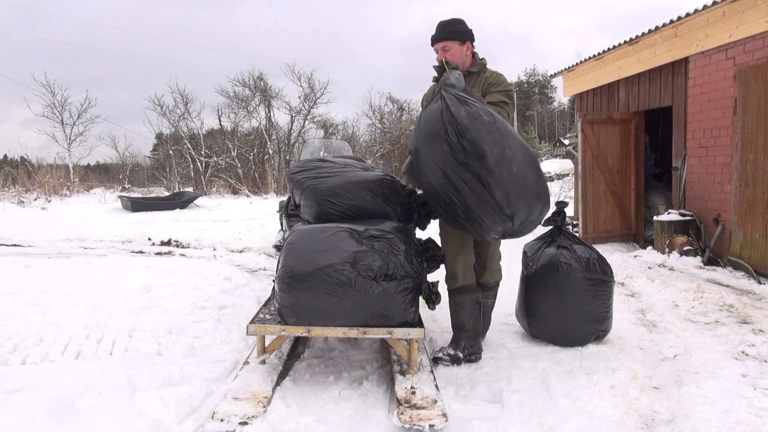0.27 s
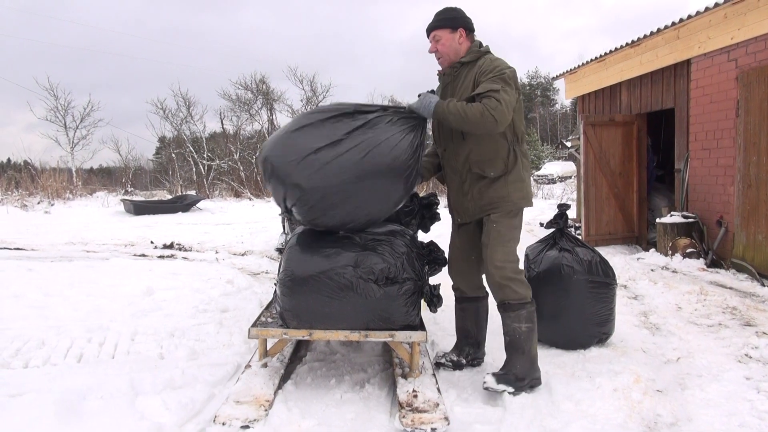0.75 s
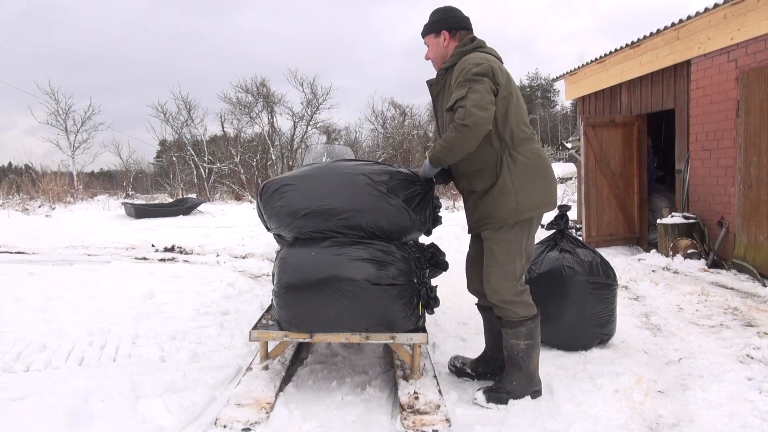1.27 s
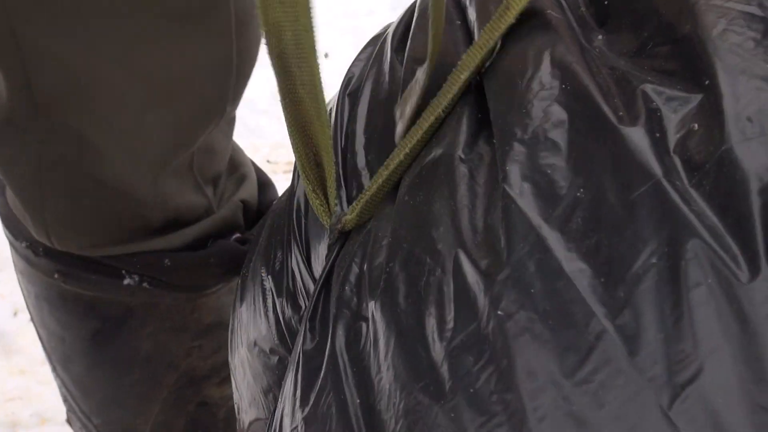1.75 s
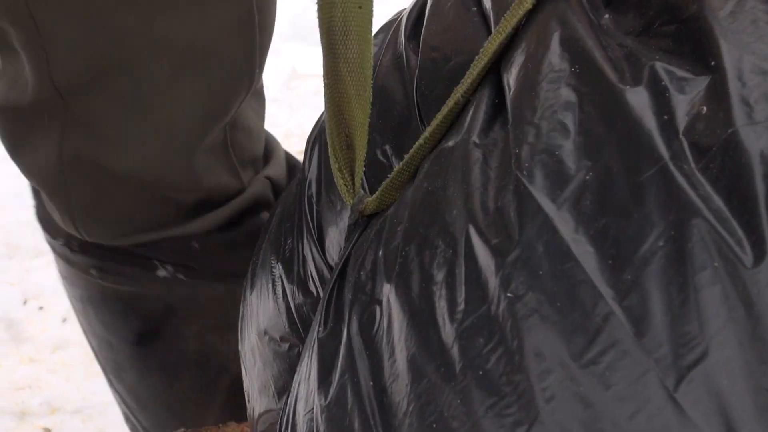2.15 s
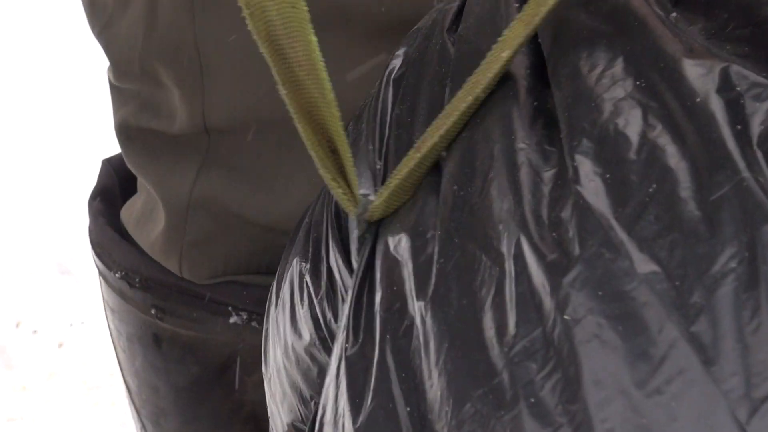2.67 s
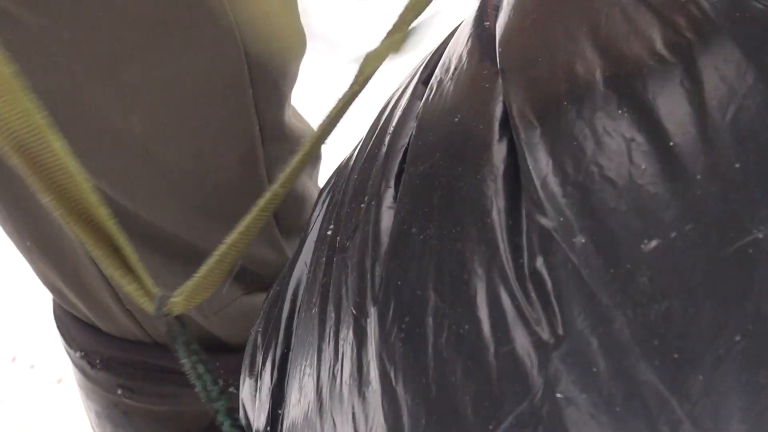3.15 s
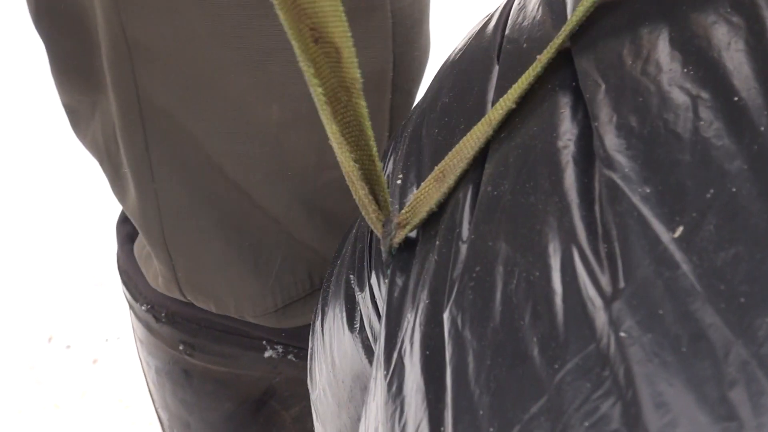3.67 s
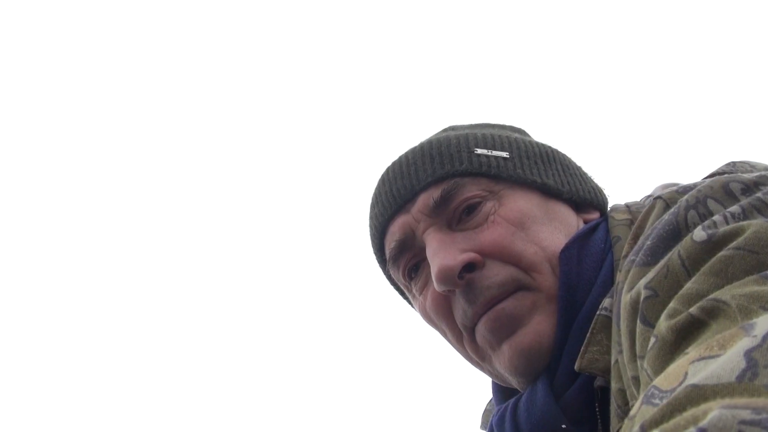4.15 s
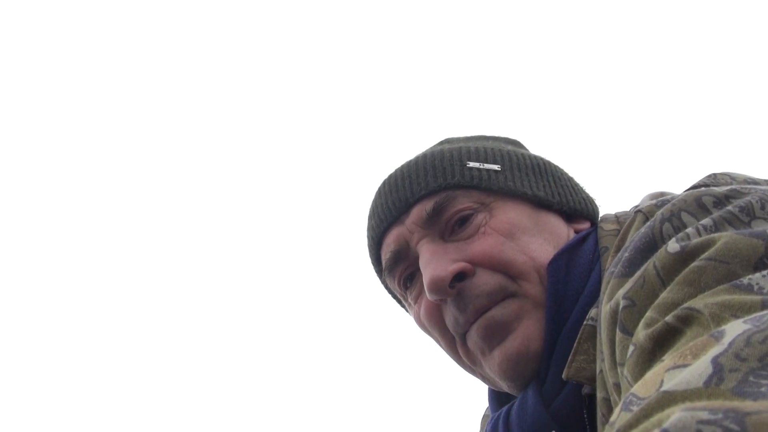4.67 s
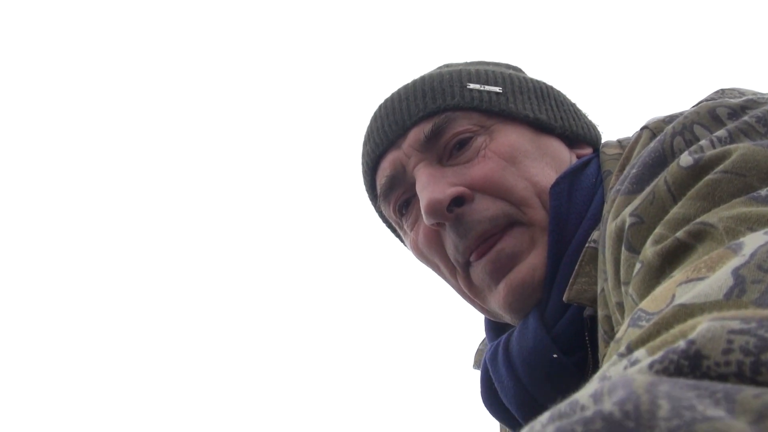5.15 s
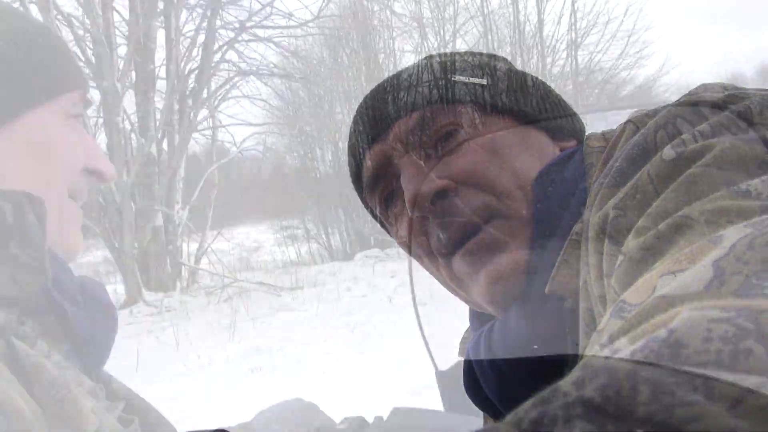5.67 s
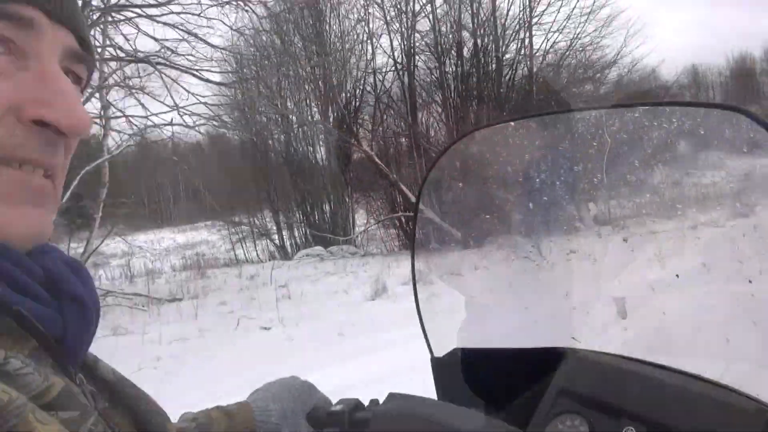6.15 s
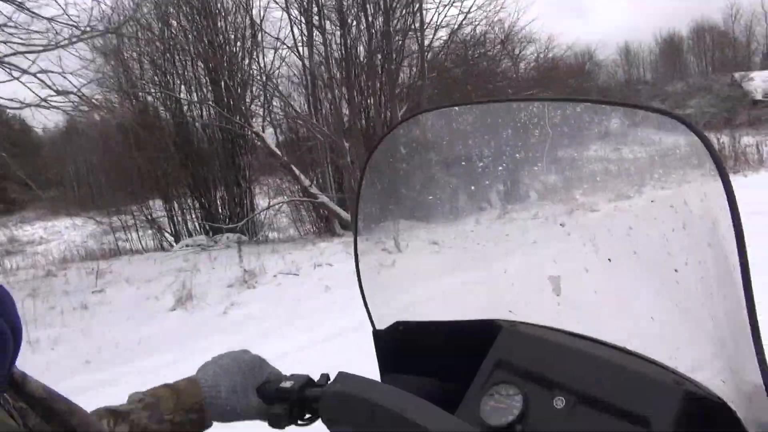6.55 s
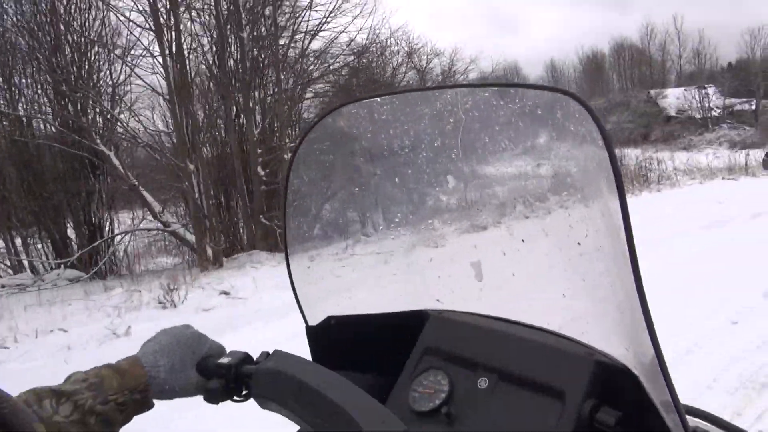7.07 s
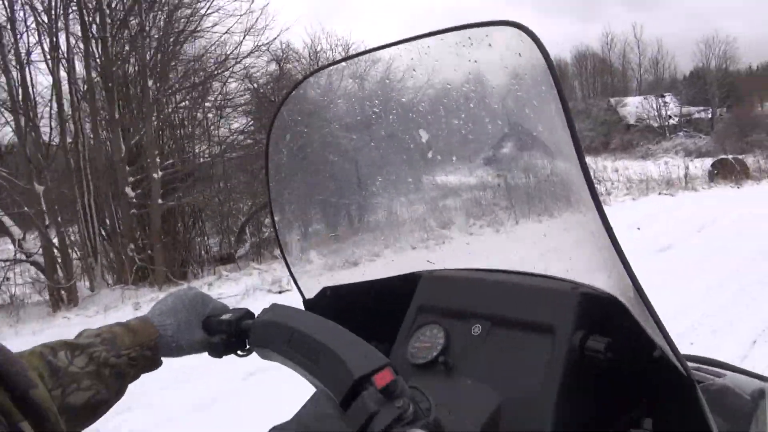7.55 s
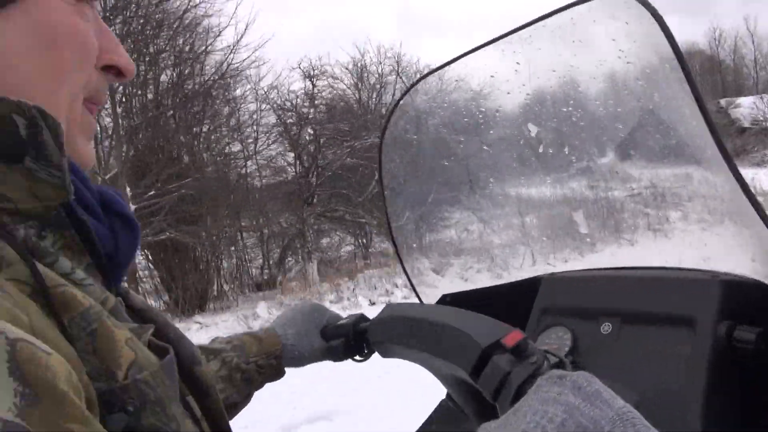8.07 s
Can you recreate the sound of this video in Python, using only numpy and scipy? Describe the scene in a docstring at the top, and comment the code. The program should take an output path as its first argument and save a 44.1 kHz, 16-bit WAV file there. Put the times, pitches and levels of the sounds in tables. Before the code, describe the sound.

In open snow with no echo, plastic slides over plastic, rustling and snapping among the dull knocks of heavy bags and boots. Close cloth rubbing follows, slightly left, and a strap squeaks faintly as it tightens. The handling then dissolves into a snowmobile ride heard from the driver's seat, the engine holding a nearly even pitch while its casing rattles, a gear whines and the rubber track churns along.

```python
"""Loading a sledge and riding off

Stuffed plastic sacks are swung onto a sledge in the snow and strapped down: the film swishes,
crinkles and thuds. A sleeve rubs over the load close by, a little to the left. Then a two-stroke
snowmobile fades in, heard from the seat at a steady speed: the exhaust drones, the engine
rattles, a gear whines and the rubber track churns the snow."""
import sys
import numpy as np
from scipy import signal
from scipy.fft import rfft, irfft
from scipy.io import wavfile

SR = 44100
rng = np.random.default_rng(int(sys.argv[2]) if len(sys.argv) > 2 else 0)


def generate_wav(sig):
    """Save sig (samples, or channels by samples) to the path in sys.argv[1] as 16-bit PCM at SR."""
    pcm = np.round(np.clip(np.atleast_2d(sig).T, -1, 1) * 32767).astype(np.int16)
    wavfile.write(sys.argv[1], SR, pcm)


N = 366912
TIME = np.arange(N) / SR

# The tone of sliding film and of flapping folds. Each row: frequency in Hz, relative level in dB.
FILM_TONE = [(290, -5.5), (480, -0.5), (707, -1.5), (878, -3.5), (1050, -0.5), (1480, 1), (1850, 0.5),
             (2150, -8), (2550, 0.5), (3000, -1.5), (5190, -5), (8200, -6.5), (9100, -6), (9750, -12.5),
             (10700, -12), (12000, -12.5), (13300, -23), (14400, -22), (15800, -28)]
FLAP_TONE = [(29, -51), (50, -29), (107, 2), (135, 4), (235, 1), (310, -8.5), (460, -5.5), (611, -5.5),
             (900, -17), (1170, -19), (1980, -120)]
# A sack slides. Each row: start, rise, hold and fade in seconds, then swish level, extra treble
# and flap level in dB.
SACK_SLIDES = [(0.0, 0.00096, 0.35, 0.37, -55, 3, -60), (0.176, 0.0046, 0.0066, 0.021, -68, 12, -63),
               (0.427, 0.009, 0.14, 0.15, -56, -3, -59), (0.662, 0.023, .004, 0.043, -63.5, 20, -89),
               (0.693, 0.05, 0.04, 0.12, -55, 10.5, -80), (0.747, 0.092, 0.28, 0.1, -47, 6, -75),
               (0.869, 0.084, 0.027, 0.079, -42.5, -29, -37.5),
               (0.983, 0.025, 0.072, 0.092, -48.5, -13, -41),
               (1.165, 0.039, 0.064, 0.24, -47.5, 1.5, -55.5), (1.406, 0.049, 0.1, 0.16, -54, 0.5, -57.5),
               (1.627, 0.044, 0.045, 0.071, -57.5, 0, -49.5), (1.69, 0.056, 0.13, 0.078, -43.5, -0.5, -42),
               (1.893, 0.12, 0.045, 0.21, -51.5, 0, -54.5), (2.143, 0.1, 0.038, 0.44, -56, -1, -55),
               (2.728, 0.03, 0.019, 0.12, -53, 6.5, -63.5), (2.782, 0.094, 0.024, 0.61, -51, 3.5, -58),
               (2.908, 0.016, 0.01, 0.04, -54.5, 11, -65), (2.994, 0.063, 0.016, 0.094, -46, 7, -46.5),
               (3.106, 0.051, 0.066, 0.077, -51, 4, -64), (3.4, 0.019, 0.025, 0.46, -64.5, 3, -59),
               (3.546, 0.11, 0.0098, 0.14, -63, 0, -51.5)]
# Where the sacks slide. Each row: time in seconds, dB louder on the left.
SACK_PAN = [(0, -0.1), (2.6, -1.5), (2.9, -3.5), (3.6, -3)]

def sliding_sacks():
    """Film slides over film: tiny creases give way, more of them the faster it moves; slack folds flap."""
    strokes = np.array([stroke(*row[:4]) for row in SACK_SLIDES])
    swish_db, treble_db, flap_db = np.transpose(SACK_SLIDES)[4:]
    slide_gain = joint_gain(strokes, swish_db)
    treble_gain = joint_gain(strokes, swish_db + treble_db)
    creases = clicks(4000 * np.sqrt(slide_gain / slide_gain.max()), spread_db=3.5)
    swish = shape_noise(hiss() + 0.62 * creases, FILM_TONE, CENTRE, side_db=-24)
    treble = signal.sosfiltfilt(signal.butter(1, 6000, "high", fs=SR, output="sos"), swish)
    flap = shape_noise(clicks(500, spread_db=2.5), FLAP_TONE, CENTRE, side_db=-20.5)
    sliding = ((swish - treble) * slide_gain + treble * treble_gain) * from_db(0.73 * drift(78))
    crinkle = from_db(-15) * crackles(500, low_hz=5000, high_hz=11000) * treble_gain
    folds = from_db(-13) * crackles(160, low_hz=2400, high_hz=4580, width_share=0.062, count=4)
    flapping = flap * joint_gain(strokes, flap_db) * from_db(-1.5 * drift(23))
    place_db, = follow(SACK_PAN)
    return (sliding + crinkle + folds * slide_gain + flapping) * pan(place_db)


# Knocks of the load and boots. Each row: start in seconds, body level in dB, base pitch in Hz,
# ring time in seconds, slap level in dB, top of the slap in Hz, pitch of the sack's skin in Hz.
KNOCKS = [(0.035, -33.5, 170, 0.042, -65, 700, 400), (0.049, -33, 200, 0.032, -33.5, 900, 520),
          (0.182, -39, 225, 0.057, -53.5, 700, 400), (0.28, -36.5, 201, .045, -46, 900, 500),
          (0.29, -40, 252, 0.022, -34.5, 1580, 477), (0.325, -30.5, 262, .035, -39, 700, 450),
          (0.341, -35, 218, 0.066, -35, 990, 480), (0.429, -30, 229, .026, -37, 900, 450),
          (0.444, -16, 155, .044, -25.5, 910, 534), (0.449, -43, 201, .03, -29.5, 1500, 376),
          (0.943, -16.5, 238, 0.035, -22.5, 1100, 560), (0.985, -22.5, 260, .048, -40, 1000, 446),
          (1.3, -11, 129, 0.022, -26.5, 960, 444), (1.347, -27.5, 131, 0.057, -42, 700, 380),
          (1.386, -31, 152, 0.058, -31, 784, 424), (1.463, -34, 161, .034, -35.5, 1400, 583),
          (1.747, -21, 138, .04, -40, 1800, 500), (1.758, -23.5, 148, .041, -22.5, 1330, 456),
          (1.834, -18, 144, 0.061, -25, 1100, 400), (1.9075, -15, 172, 0.049, -15.5, 980, 526),
          (1.922, -16, 171, 0.034, -23, 990, 566), (1.948, -21.5, 186, .022, -36, 900, 400),
          (2.032, -30.5, 131, 0.1, -49, 700, 380), (2.2323, -17.5, 144, 0.032, -35, 1500, 395),
          (2.454, -28.5, 205, 0.11, -32, 620, 450), (2.474, -26, 208, 0.018, -30, 930, 446),
          (2.521, -17.5, 147, 0.036, -30, 1700, 413), (2.569, -24.5, 150, .04, -37, 1600, 403),
          (2.591, -21, 137, 0.049, -37, 1700, 410), (3.064, -32, 231, 0.11, -39, 900, 480),
          (3.342, -33, 146, 0.04, -63, 597, 386), (3.419, -34.5, 214, .03, -49, 760, 560),
          (3.447, -38, 189, .034, -60, 600, 400), (3.4645, -21, 204, 0.045, -33, 1000, 335),
          (3.473, -22, 179, 0.019, -35, 1400, 364), (3.578, -48, 190, 0.03, -44, 1400, 350),
          (3.606, -25, 157, 0.045, -37, 1520, 403), (3.633, -29, 194, 0.06, -40, 900, 370),
          (3.818, -26, 200, .03, -35, 1250, 332), (3.823, -17.5, 143, 0.049, -25, 1270, 332),
          (4.012, -28, 187, 0.11, -31, 900, 620), (4.187, -17, 118, 0.046, -52, 800, 400),
          (4.273, -22, 121, .062, -29, 900, 600), (4.298, -16, 167, 0.055, -24, 794, 613),
          (4.571, -13, 143, 0.045, -38, 1300, 400), (4.586, -14, 136, 0.028, -33, 1300, 380),
          (4.683, -16.5, 127, 0.031, -30, 706, 428), (4.707, -19.5, 150, 0.048, -52, 600, 400),
          (4.736, -15, 126, 0.04, -50, 600, 400), (5.017, -26, 204, 0.06, -48, 700, 480),
          (5.295, -27, 110, 0.057, -70, 600, 400), (5.797, -19, 172, 0.086, -46, 700, 450),
          (5.83, -13, 166, .039, -48, 700, 450), (5.997, -25, 130, .034, -48, 700, 400),
          (6.039, -19, 161, 0.037, -22, 895, 430)]
# How a sack's tight skin rings. Each row: multiple of its pitch, relative level in dB.
SKIN_RINGS = [(1, 0), (2.12, -3), (3.25, -3)]
# Where the knocks fall. Each row: time in seconds, dB louder on the left.
KNOCK_PAN = [(1.9, 2), (2.5, 1), (3.8, 0.5), (4.05, 7), (6, 9)]

def thuds(dive_s=0.0022, swell_s=0.0074, delay_s=0.00196):
    """Tight film slaps with a hollow ring; the soft load swings, its pitch diving as the tension goes."""
    out, t = np.zeros((2, N)), np.arange(SR // 5) / SR
    for start, body_db, hz, ring_s, slap_db, top_hz, skin_hz in KNOCKS:
        noise = rng.standard_normal((2, len(t)))
        # the pitch starts high and lands a little below the base pitch
        cycles = hz * (0.884 * t + 1.66 * dive_s * (1 - np.exp(-t / dive_s)))
        body = np.sin(2 * np.pi * cycles) * die_away(t, ring_s) * swell(t, swell_s)
        settling = from_db(-25) * unit_level(band(noise[0], 64, 277)) * die_away(t, 0.18)
        # the skin rings differently at every spot
        ring = sum(from_db(db + 2.5 * rng.standard_normal()) * np.sin(2 * np.pi * ratio * skin_hz * t)
                   for ratio, db in SKIN_RINGS)
        skin = 0.93 * ring + 0.45 * unit_level(band(noise[1], 320, 2400))
        slap = cut_treble(skin * die_away(t, 0.016) * swell(t, 0.0012), top_hz)
        add(out, start + delay_s, from_db(body_db) * (body + settling) + from_db(slap_db) * slap)
    place_db, = follow(KNOCK_PAN)
    # the knocks carry no deep bass
    return signal.sosfilt(signal.butter(2, 55, "high", fs=SR, output="sos"), out) * pan(place_db)


# Single creases. Each row: start in seconds, crack level in dB, middle of the crack in Hz,
# tick level in dB, treble limit in Hz.
CREASE_SNAPS = [(0.1844, -35.5, 5500, -46, 12000), (0.2912, -42, 1300, -55, 12000),
                (0.495, -40, 1350, -58, 12000), (0.559, -47, 3600, -64, 11450),
                (0.826, -44, 3970, -34, 13400), (1.162, -38, 5500, -58.5, 11560),
                (1.349, -44, 5500, -50, 12000), (1.705, -38, 2500, -45, 12500),
                (1.745, -25, 2500, -36, 13000), (2.0432, -30, 4060, -45, 13500),
                (2.0505, -33, 5000, -51, 12500), (2.0914, -35, 5500, -53, 12500),
                (2.267, -43, 5500, -54, 12000), (2.326, -38, 5500, -55, 12000),
                (2.788, -35, 6500, -57, 11500), (2.921, -31, 4000, -46, 14000),
                (3.078, -37, 4500, -40, 13000), (3.607, -50, 2200, -57, 13000),
                (3.899, -46, 1980, -63, 15200), (4.0328, -32, 2500, -37, 15500),
                (4.061, -32, 1800, -39, 15500), (4.112, -43, 1190, -58, 15500),
                (4.167, -47, 2000, -56, 15500), (4.236, -38, 2500, -38, 15500),
                (4.2798, -30, 2500, -30, 15500), (4.305, -33, 2000, -36, 15500),
                (4.43, -43, 2400, -59, 15500), (4.4596, -38, 2200, -58, 15500),
                (4.485, -47, 3000, -38, 15500), (4.5535, -47, 3000, -39, 15500),
                (4.5777, -37, 2000, -46, 15500), (4.6189, -37, 1600, -55, 15500),
                (4.654, -38, 2500, -46, 15500), (4.743, -42, 2500, -43, 15500),
                (4.7684, -46, 3000, -44, 15500), (4.82, -36, 2600, -42, 15500),
                (5.1133, -38.5, 2550, -55, 15500), (5.339, -52, 3000, -52, 15500),
                (5.458, -37, 3000, -48, 15500), (5.788, -48, 3760, -40.5, 15500)]

def snaps():
    """A stiff crease pops over: a sudden crack, and a bright tick from the finest wrinkles."""
    out, t = np.zeros((2, N)), np.arange(SR // 10) / SR
    for start, crack_db, hz, tick_db, top_hz in CREASE_SNAPS:
        noise = rng.standard_normal((2, len(t)))
        pop = 6 * (t == 0) + noise[0] * die_away(t, 0.016)
        crack = cut_treble(band(pop, hz / 2, hz * 2), top_hz)
        tick = band(noise[1] * die_away(t, 0.023) * swell(t, 0.0012), 8100, top_hz)
        add(out, start, from_db(crack_db) * crack / np.abs(crack).max())
        add(out, start, from_db(tick_db) * tick / np.abs(tick).max())
    return out


# The tone of the cloth's scratch and rumble. Each row: frequency in Hz, relative level in dB.
SCRATCH_TONE = [(240, -7), (400, 0), (600, -4.5), (920, -7.5), (1280, -4), (2070, -6.5), (2800, -6.5),
                (4080, -10), (4650, -7.5), (7700, -16), (12000, -12.5), (14200, -21), (15800, -25)]
RUMBLE_TONE = [(24, -48), (40, -25), (81, -4), (167, -3.5), (237, -7.5), (390, -29), (600, -31), (780, -54),
               (1320, -120)]
# Where the sleeve is heard. Each row: frequency in Hz, dB louder on the left.
CLOTH_PAN = [(60, 0.5), (200, 7.5), (700, 15.5), (1300, 3), (2400, 1.5), (8000, 0)]
# The sleeve rubs. Each row: start, rise, hold and fade in seconds, then scratch and rumble level in dB.
SLEEVE_RUBS = [(3.887, 0.011, 0.16, 0.47, -51, -57), (3.985, 0.03, 0.079, 0.018, -47.5, -41),
               (4.13, 0.13, 0.017, 0.083, -42, -42), (4.255, 0.02, 0.05, 0.078, -44, -37),
               (4.31, 0.012, 0.16, 0.29, -52.5, -51.5), (4.544, 0.012, 0.026, 0.07, -43, -35),
               (4.624, 0.029, 0.076, 0.35, -50, -46.5), (4.82, 0.14, 0.088, 0.069, -45.5, -43),
               (5.094, 0.024, 0.0093, 0.067, -48.5, -42.5), (5.169, 0.065, 0.2, 1, -55, -53),
               (5.762, 0.053, 0.041, 0.059, -57, -36.5), (5.876, 0.069, 0.11, 0.14, -56, -39)]

def sleeve():
    """Cloth drags over the load in catches and slips: a crackly hiss over a dull rumble."""
    strokes = np.array([stroke(*row[:4]) for row in SLEEVE_RUBS])
    scratch_db, rumble_db = np.transpose(SLEEVE_RUBS)[4:]
    scratch = shape_noise(hiss() + 0.4 * clicks(900, spread_db=3), SCRATCH_TONE, CLOTH_PAN, side_db=-11)
    scratch += from_db(-9) * crackles(260, low_hz=1100, high_hz=3600) * pan(3.4)
    scratch += from_db(-13) * crackles(220, low_hz=7000, high_hz=14500, count=5)
    rumble = shape_noise(clicks(500, spread_db=0.5), RUMBLE_TONE, CLOTH_PAN, side_db=-14)
    bumps = joint_gain(strokes, rumble_db) * from_db(3 * drift(24))
    catches = joint_gain(strokes, scratch_db) * from_db(1.5 * drift(39))
    return scratch * catches + rumble * bumps


# Low groans of the film. Each row: start and length in seconds, then slack, tight and final pitch
# in Hz, then level in dB.
FILM_GROANS = [(3.893, 0.1, 176, 194, 163, -46.5), (4.2, 0.106, 152, 325.5, 213, -41)]

def groans(edge_s=0.0071, tightest_share=0.317):
    """Film sticks and slips: the slips come faster as it is pulled tight and slow down as it gives."""
    out = 0
    for start, length, slack_hz, tight_hz, end_hz, db in FILM_GROANS:
        hz = np.interp((TIME - start) / length, [0, tightest_share, 1], [slack_hz, tight_hz, end_hz])
        angle = angle_of(hz * (1 + 0.06 * drift(60)))
        slips = np.sqrt(2) * (np.sin(angle) + from_db(-14) * np.sin(2 * angle))
        out += from_db(db + 2.2 * drift(35)) * stroke(start, edge_s, length - edge_s, edge_s) * slips
    return out * pan(5.4)


# Strap squeaks. Each row: start and length in seconds, pitch and width in Hz, level in dB.
STRAP_SQUEAKS = [(4.825, 0.06, 4640, 120, -63), (5.354, 0.05, 4600, 350, -58),
                 (5.355, 0.04, 2580, 200, -60), (5.415, 0.042, 1936, 40, -52.5),
                 (5.403, 0.042, 4750, 400, -61), (5.41, 0.04, 6900, 600, -62)]

def strap():
    """A strap is drawn tight: each quick slip of the webbing rings briefly around one pitch."""
    out = np.zeros((2, N))
    for start, length, hz, width_hz, db in STRAP_SQUEAKS:
        fade = signal.windows.tukey(round(length * SR), 0.5)
        ring = resonate(rng.standard_normal(SR // 5), [(hz, width_hz, 0)])
        add(out, start, from_db(db) * fade * ring[-len(fade):])
    return out


# The engine's speed. Each row: time in seconds, turns of the crankshaft per second.
ENGINE_SPEED = [(5.4, 76.1), (5.58, 74.7), (5.63, 75.2), (5.73, 74.7), (6.0, 75.0), (6.05, 75.7),
                (6.26, 77.0), (6.48, 77.3), (6.58, 78.6), (6.8, 78.8), (7.1, 77.4), (7.35, 78.8),
                (7.5, 77.7), (7.58, 78.6), (7.78, 76.7), (8.02, 76.8), (8.14, 76.2), (8.3, 75.9)]
# How hard the engine pulls. Each row: time in seconds, effort from 0 to 1.
ENGINE_EFFORT = [(5.92, 0.04), (6.07, 0.46), (6.45, 0.71), (6.62, 0.75), (7.0, 0.87), (7.11, 0.62),
                 (7.22, 0.93), (7.45, 1), (8.0, 0.76), (8.3, 0.55)]
# Where the exhaust and track are heard. Each row: frequency in Hz, dB louder on the left.
SNOWMOBILE_PAN = [(60, 2), (200, 2), (400, -4), (700, -5.5), (4400, -4), (15000, -3)]

def snowmobile():
    """Two cylinders fire in turn, spinning the crankshaft that drives the gear and the track."""
    speed, = follow(ENGINE_SPEED)
    effort, = follow(ENGINE_EFFORT)
    angle = angle_of(speed * (1 + 0.0007 * drift(13)))
    gusts = 1 + 0.04 * np.cos(2 * angle) + 0.046 * np.cos(angle)  # of intake and exhaust
    drone = exhaust(angle, speed, effort)
    rattle = casing(angle, gusts, effort) + hood(angle, effort)
    churn = track_churn(gusts, effort)
    roughness = 1 + 0.03 * drift(31)
    return drone * roughness + rattle + churn + gear(speed) + track_cogs() + track_growl()


# The exhaust's tones. Each row: multiple of the engine speed, level in dB before cruising,
# level in dB while cruising, dB lost at zero effort.
EXHAUST_TONES = [(1, -51.5, -63, 21), (2, -38, -38, 11), (3, -39.5, -41.5, 13.5), (4, -39, -42, -1.5),
                 (5, -37, -39.5, 12.5), (6, -44.5, -45.5, -2), (7, -51.5, -62, 0), (8, -48, -47.5, -2),
                 (9, -49.5, -66, 21), (10, -60.5, -54.5, -6), (11, -73, -63, 10), (14, -57, -64, 9),
                 (15, -54, -75, 11), (16, -76, -61.5, -22.5), (17, -88, -72, -3), (20, -67, -62, 5),
                 (21, -93, -66, 1), (22, -54, -50.5, -1.5), (28, -62.5, -61, 0), (30, -77, -56, 7),
                 (46, -66.5, -68, 5), (53, -64, -64, 3)]

def exhaust(angle, speed, effort, pipe_hz=304.5, pipe_half_width_hz=2.6):
    """The firings make a stack of tones; the mismatch of the two cylinders gives the odd multiples."""
    cruising = ramp(7.1, 7.3)
    out = 0
    for multiple, early_db, cruise_db, lost_db in EXHAUST_TONES:
        db = early_db + (cruise_db - early_db) * cruising - lost_db * (1 - effort)
        # the pipe lifts any tone that comes near its own pitch
        pipe_db = 5 / (1 + ((multiple * speed - pipe_hz) / pipe_half_width_hz) ** 2)
        gain = from_db(db + pipe_db + 1.5 * drift(5))
        # the muffler delays each tone differently, smearing the pulses into an even drone
        smear = np.pi * multiple ** 2 / 4
        place_db = at_hz(SNOWMOBILE_PAN, multiple * speed.mean())
        out += gain * np.cos(multiple * angle - smear) * pan(place_db)
    return out


# Ringing engine parts. Each row: pitch in Hz, width in Hz, relative level in dB.
CASING_RINGS = [(930, 39, -10), (1245, 14, 4.5), (1663, 85, 2), (2303, 94, -10.5), (3780, 54, -16),
                (4130, 73, -12)]

def casing(angle, gusts, effort):
    """The engine's metal casing rings with a steady rattle and two uneven piston slaps per turn."""
    firings = np.diff(angle // np.pi, prepend=0)
    slaps = unit_level(firings * from_db(11.5 * rng.standard_normal(N)))
    shaking = hiss()[0] * gusts + from_db(-3.5) * slaps
    return resonate(shaking, CASING_RINGS) * from_db(-62 + 13.5 * effort) * pan(-0.94)


def hood(angle, effort):
    """The engine's cover buzzes, jolted once per turn of the crankshaft."""
    jolts = np.diff(angle // (2 * np.pi), prepend=0)
    return from_db(-55 + 2 * effort) * unit_level(band(jolts, 720, 2000)) * pan(-2.5)


# The tone of the running track. Each row: frequency in Hz, relative level in dB.
TRACK_TONE = [(35, -20), (60, -2), (90, 0.5), (180, 6.5), (330, 5.5), (520, 1), (720, -1.5), (1200, -2),
              (1800, -4), (2700, -10), (4300, -15.5), (7000, -23.5), (11000, -33), (15000, -107)]

def track_churn(gusts, effort):
    """The rubber track churns the snow; only its brighter clatter grows with the engine's effort."""
    snow = hiss() + 0.09 * clicks(900, spread_db=5.5)
    track = shape_noise(snow * gusts, TRACK_TONE, SNOWMOBILE_PAN, side_db=-28)
    dull = signal.sosfiltfilt(signal.butter(2, 550, fs=SR, output="sos"), track)
    clatter = from_db(-44 + 5 * effort) * (track - dull)
    return (from_db(-41) * dull + clatter) * from_db(1.03 * drift(52))


# How loud the gear and its overtone are. Each row: time in seconds, level in dB.
GEAR_LOUDNESS = [(5.7, -59), (6.0, -53), (6.35, -53.5), (6.85, -51.5), (7.05, -53), (7.3, -52),
                 (7.55, -55.5), (8.3, -66)]
OVERTONE_LOUDNESS = [(6.3, -67), (6.6, -57), (6.88, -59), (7.04, -68), (7.17, -56.5), (7.44, -56),
                     (7.54, -74), (7.72, -64), (7.85, -62), (8.3, -58.5)]

def gear(speed):
    """A gear whines in step with the crankshaft, with a thin overtone at three times its pitch."""
    whine_db, = follow(GEAR_LOUDNESS)
    overtone_db, = follow(OVERTONE_LOUDNESS)
    whine = from_db(whine_db) * wavering_tone(13.23 * speed, waver_hz=1.2, flutter_db=-1.5)
    overtone = from_db(overtone_db) * wavering_tone(39.69 * speed, waver_hz=13, flutter_db=1)
    return (whine + overtone) * pan(-8)


# The track gathers speed. Each row: time in seconds, cog strikes per second, level in dB.
COG_STRIKES = [(6.1, 860, -65), (6.35, 876, -49), (6.7, 910, -55), (7.2, 890, -57), (7.6, 890, -57),
               (7.77, 950, -46.5), (8.0, 990, -61), (8.32, 990, -48)]

def track_cogs(wheel_hz=15):
    """The track's cogs whirr, throbbing with each turn of the drive wheel."""
    hz, db = follow(COG_STRIKES)
    throb = 1 + 0.26 * np.cos(2 * np.pi * wheel_hz * TIME)
    return from_db(db) * rough_tone(hz, width_hz=45) * throb * ramp(5.9, 6.1) * pan(-8)


# The track's growl. Each row: time in seconds, pitch in Hz, level in dB.
TRACK_DRUMMING = [(5.9, 410, -60), (6.3, 430, -47), (6.7, 435, -49.5), (7.05, 445, -46), (7.25, 530, -51),
                  (7.8, 555, -47), (8.3, 545, -55)]

def track_growl():
    """The track drums on the snow with a rough note that climbs with the ground speed."""
    hz, db = follow(TRACK_DRUMMING)
    return from_db(db) * rough_tone(hz, width_hz=31) * pan(-2)


# The tone of the open air. Each row: frequency in Hz, relative level in dB.
AIR_TONE = [(18, -43), (30, 3), (134, 7.5), (193, 9), (860, -3.5), (1340, -0.5), (2100, -4.5), (2660, -5),
            (8870, -13.5), (13900, -15), (15800, -30)]

def air():
    """A faint, steady hush lies under everything."""
    return from_db(-61.5) * shape_noise(hiss(), AIR_TONE, CENTRE, side_db=-9)


# How wide noises sound. Each row: frequency in Hz, dB added to the part that differs between the ears.
STEREO_WIDTH = [(60, -5.5), (700, 8), (2400, -4.5), (4400, -4), (8100, 11), (13000, -10.5)]
# A sound straight ahead. Each row: frequency in Hz, dB louder on the left (zero).
CENTRE = [(60, 0), (15000, 0)]

def shape_noise(pair, tone, place, side_db):
    """Two noises become the middle and sides of one stereo sound with a given tone and place."""
    hz = np.arange(N // 2 + 1) * SR / N
    middle, side = rfft(pair) * from_db(at_hz(tone, hz))
    sides = from_db(side_db + at_hz(STEREO_WIDTH, hz)) * side * [[1], [-1]]
    stereo = irfft((middle + sides) * pan(at_hz(place, hz)), N)
    return stereo / np.std(stereo.mean(0))


def hiss():
    """Two unrelated white noises."""
    return rng.standard_normal((2, N))


def clicks(per_s, spread_db):
    """Two streams of random clicks of uneven size."""
    sizes = from_db(spread_db * np.minimum(rng.exponential(1, (2, N)), 4))
    signs = rng.choice([-1, 1], (2, N))
    return unit_level(sizes * signs * (rng.random((2, N)) < per_s / SR))


def crackles(per_s, low_hz, high_hz, width_share=0.17, count=10):
    """Scattered tiny creases, each ringing briefly at one of a few pitches."""
    creases = clicks(per_s, spread_db=1)[0]
    choice = rng.integers(0, count, N)
    rings = (resonate(creases * (choice == k) + 1e-18, [(hz, width_share * hz, 0)])
             for k, hz in enumerate(np.geomspace(low_hz, high_hz, count)))
    return unit_level(sum(rings))


def wavering_tone(hz, waver_hz, flutter_db):
    """A tone that wavers in pitch and strength."""
    angle = angle_of(hz + waver_hz * drift(28.2))
    return np.sqrt(2) * np.sin(angle) * from_db(flutter_db * drift(10))


def rough_tone(hz, width_hz):
    """A narrow band of noise around a moving pitch."""
    angle = angle_of(hz)
    return drift(width_hz) * np.cos(angle) + drift(width_hz) * np.sin(angle)


def drift(rate_hz):
    """A smooth random wobble, about 1 in size; a higher rate wobbles faster."""
    r = np.exp(-80 * np.pi * rate_hz / SR)
    noise = rng.standard_normal(N // 40 + 2002)  # one value per 40 samples
    slow = signal.lfilter([1], [1, -2 * r, r * r], noise)[2000:]
    return np.interp(np.arange(N) / 40, np.arange(len(slow)), unit_level(slow))


def resonate(x, rings):
    """Make a sound ring at the given pitches."""
    out = 0
    for hz, width_hz, db in rings:
        r = np.exp(-np.pi * width_hz / SR)
        feedback = [1, -2 * r * np.cos(2 * np.pi * hz / SR), r * r]
        out += from_db(db) * (1 - r * r) / 2 * signal.lfilter([1, 0, -1], feedback, x)
    return unit_level(out)


def band(x, low_hz, high_hz):
    """Keep what lies between two frequencies."""
    return signal.sosfilt(signal.butter(2, [low_hz, high_hz], "band", fs=SR, output="sos"), x)


def cut_treble(x, top_hz):
    """Keep what lies below a frequency."""
    return signal.sosfilt(signal.butter(6, top_hz, fs=SR, output="sos"), x)


def stroke(start, rise, hold, fade):
    """One movement: grows evenly, holds, then loses 20 dB in each fade time."""
    fades_passed = np.clip((TIME - start - rise - hold) / fade, 0, 6)
    return ramp(start, start + rise) * from_db(-20 * fades_passed)


def joint_gain(strokes, db):
    """The combined strength of overlapping strokes, each at its own level."""
    return np.sqrt(from_db(2 * db) @ strokes ** 2)


def ramp(start, end):
    """Rise from 0 to 1 between two times."""
    return np.clip((TIME - start) / max(end - start, 1e-3), 0, 1)


def swell(t, rise_s):
    """Rise from 0 and level off toward 1."""
    return 1 - np.exp(-t / rise_s)


def die_away(t, ring_s):
    """Fall by 60 dB over the ring time."""
    return from_db(-60 * t / ring_s)


def follow(rows):
    """Join a table's rows with straight lines in time: one curve per value column."""
    times, *columns = np.transpose(rows)
    return [np.interp(TIME, times, column) for column in columns]


def at_hz(rows, hz):
    """Read a table between its frequencies, with octaves evenly spaced."""
    frequencies, values = np.transpose(rows)
    return np.interp(np.log(np.maximum(hz, 1)), np.log(frequencies), values)


def angle_of(hz):
    """The angle turned so far, in radians, at a changing rate."""
    return 2 * np.pi * np.cumsum(hz) / SR


def pan(db):
    """Left and right gains; positive dB is louder on the left."""
    return from_db(np.array([[0.5], [-0.5]]) * db)


def from_db(db):
    """Turn decibels into a multiplier."""
    return 10 ** (np.asarray(db) / 20)


def unit_level(x):
    """Scale to an average (rms) level of 1."""
    return x / np.sqrt(np.mean(x ** 2) + 1e-20)


def add(out, start, sound):
    """Mix a sound in at a time in seconds."""
    at = round(start * SR)
    out[:, at:at + sound.shape[-1]] += sound[..., :N - at]


def scene():
    """The sledge is loaded, then the ride fades in. Open snow gives no echo."""
    loading = sliding_sacks() + thuds() + sleeve() + groans() + snaps() + strap()
    return loading + snowmobile() * ramp(5.328, 5.89) + air()


def record(dry, top_hz=15750):
    """The very highest treble is cut off steeply."""
    return signal.sosfilt(signal.ellip(12, 0.1, 80, top_hz, fs=SR, output="sos"), dry)


dry = scene()
out = record(dry)
generate_wav(out)
```